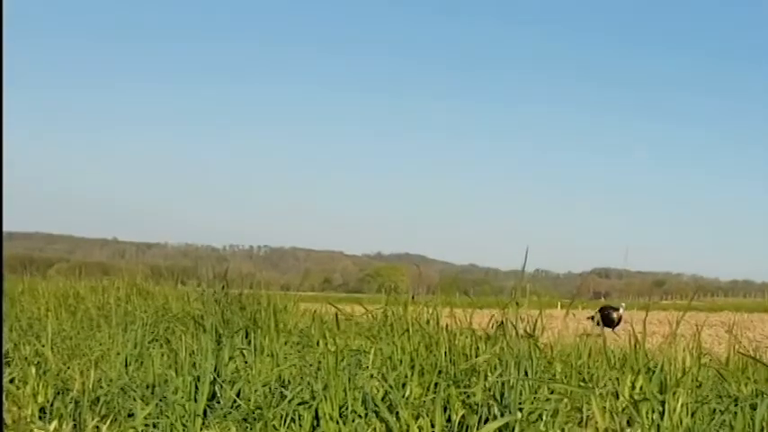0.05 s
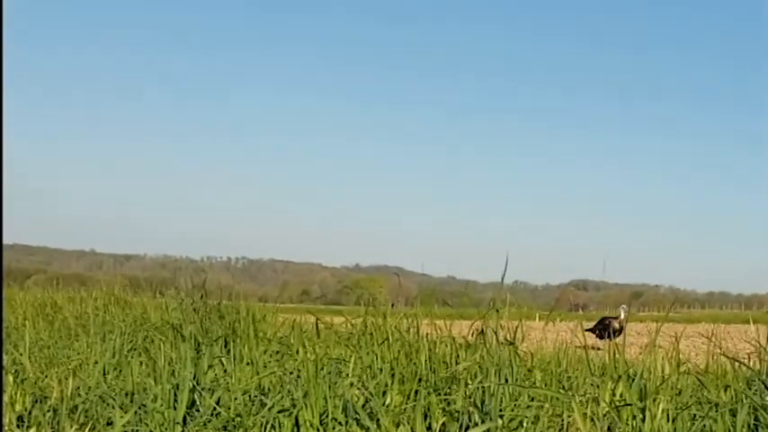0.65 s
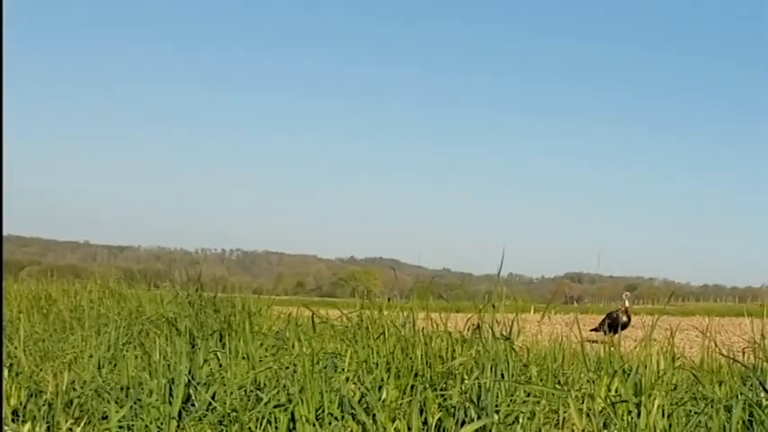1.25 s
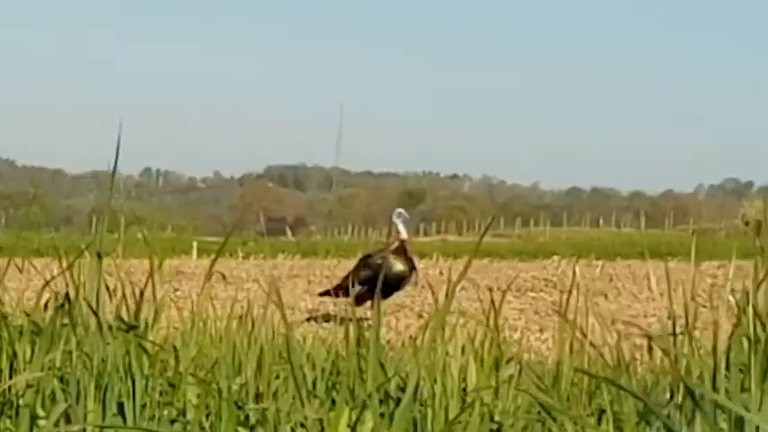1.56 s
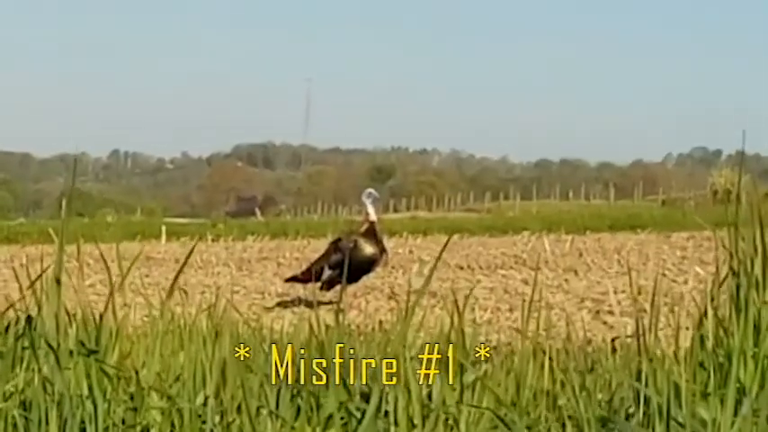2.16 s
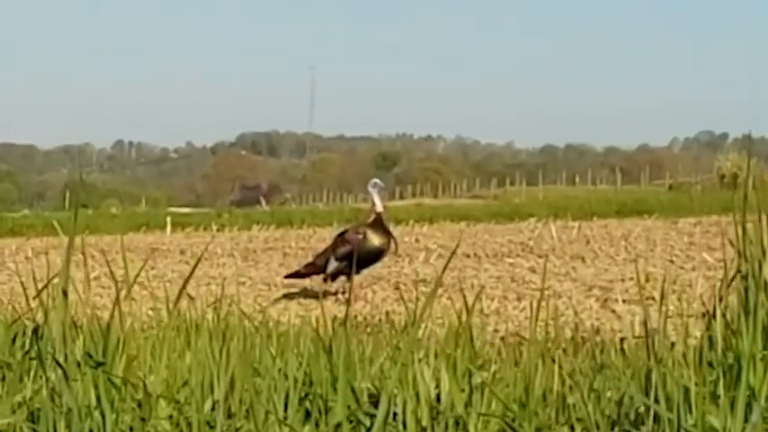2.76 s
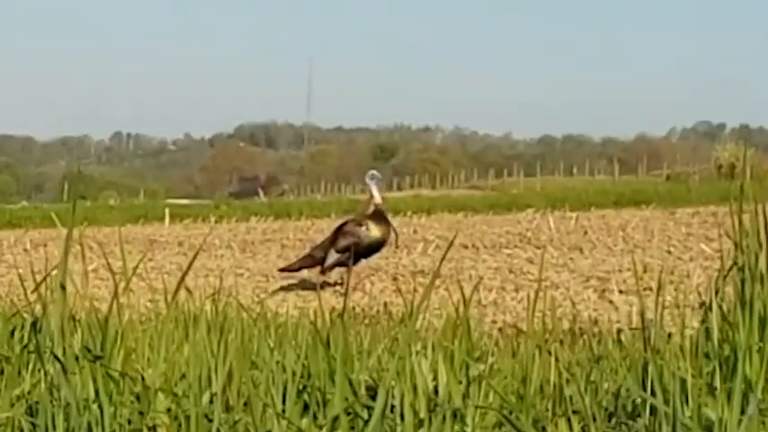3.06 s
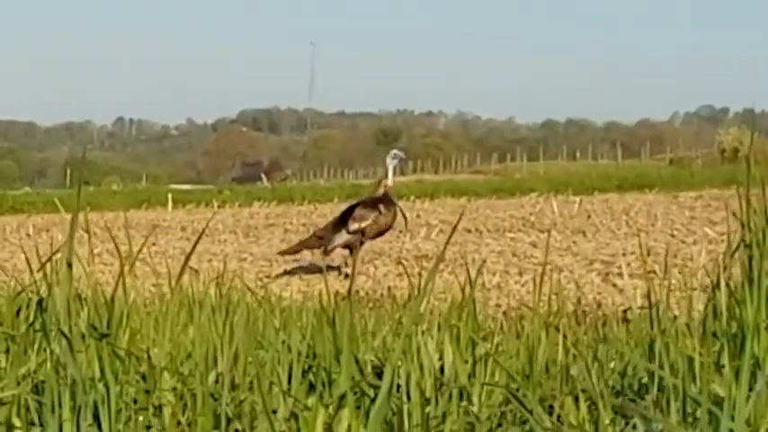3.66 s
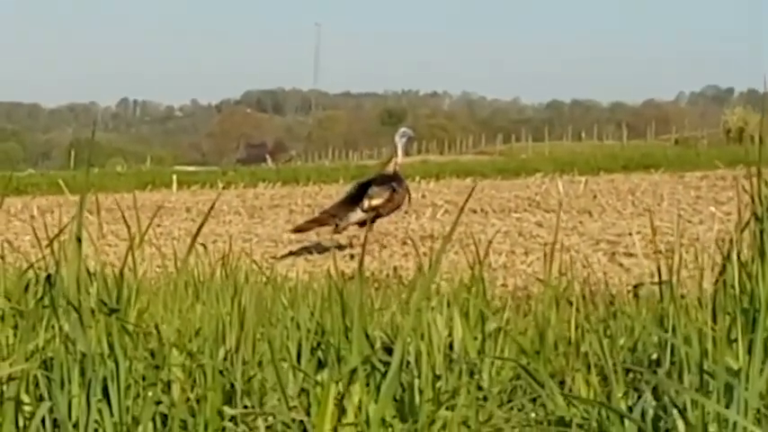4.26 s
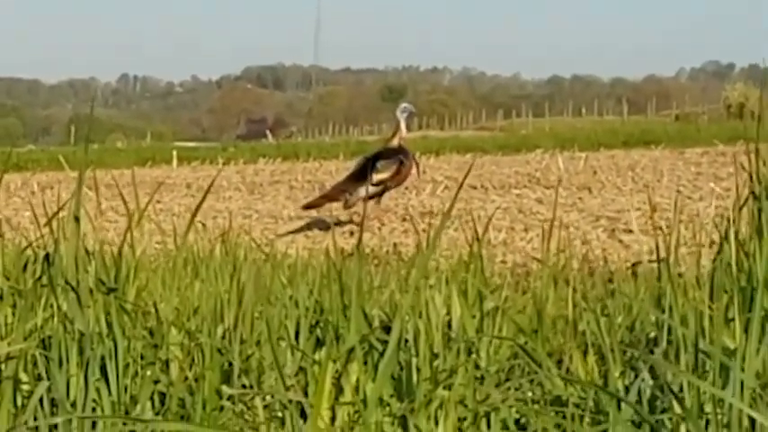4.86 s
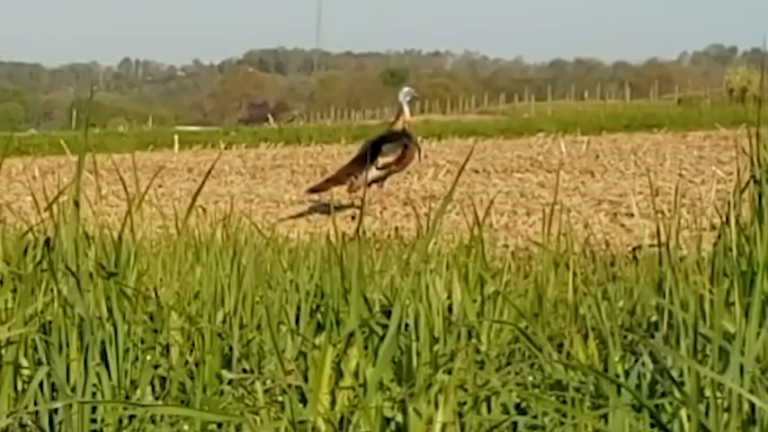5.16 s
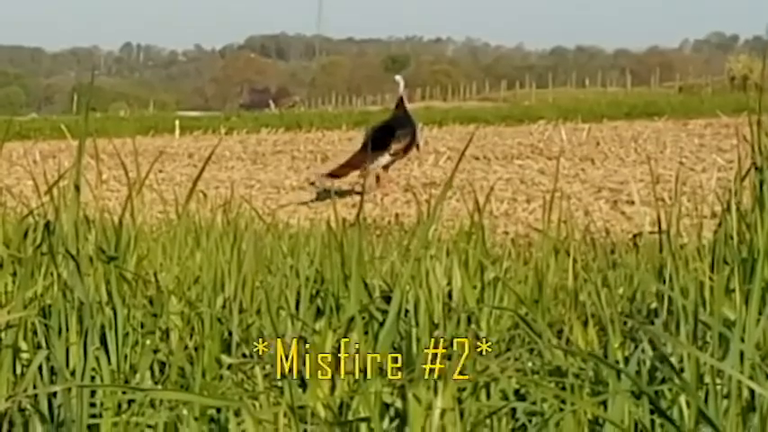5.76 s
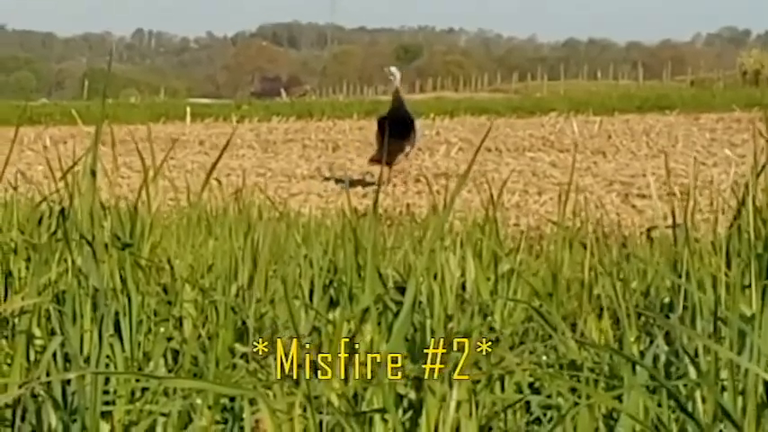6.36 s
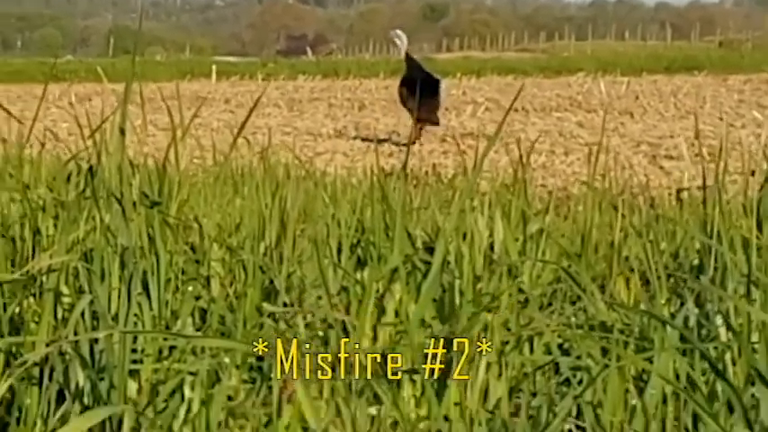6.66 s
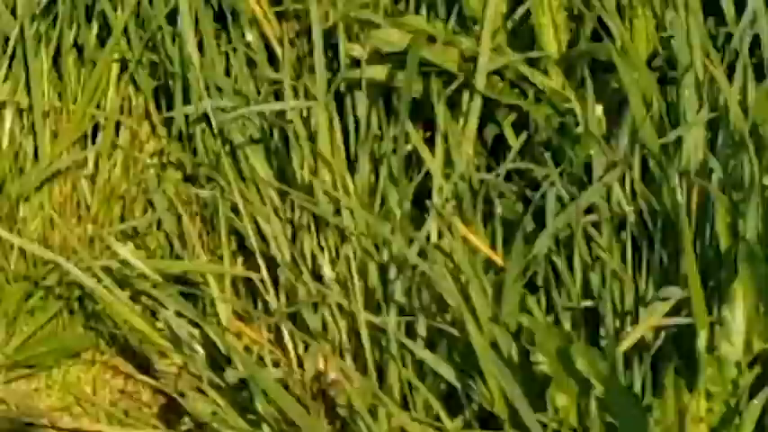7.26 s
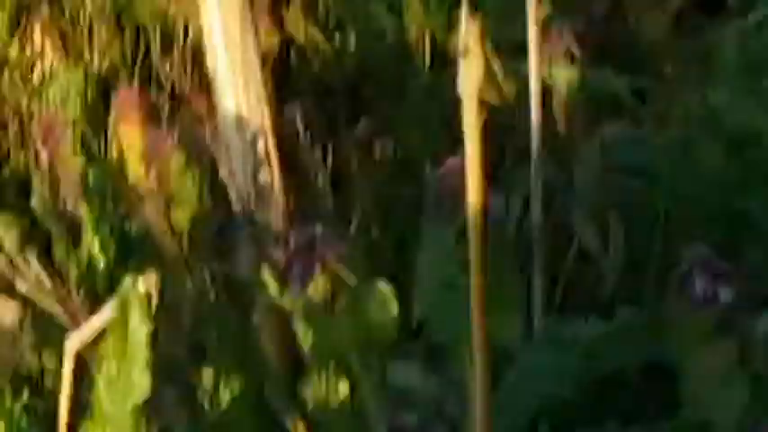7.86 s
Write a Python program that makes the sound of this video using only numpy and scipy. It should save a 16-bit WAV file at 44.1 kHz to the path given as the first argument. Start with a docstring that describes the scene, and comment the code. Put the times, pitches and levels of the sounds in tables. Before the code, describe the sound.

Steel parts of a shotgun click, clack and slide as it is dry-fired and worked twice, with rustling sleeves and faint wind.

```python
"""Faint wind crosses a field; cloth rustles and fingers knock by a close microphone, its left port covered.
At 1.47 s slow motion begins and the treble ends at 10 kHz. A hunter kneeling in tall grass dry-fires a
shotgun (1.8 s), fumbles, then works the action (4.2 s): steel parts clack, chatter and slide, the bolt
jolts the gun and sleeves rustle. The hammer falls again (5.9 s) and the action is worked again (6.7 s).
A dry stalk snaps, and at 7.94 s full speed returns with a last brush of cloth."""
import sys
import numpy as np
from scipy import signal
from scipy.fft import rfft, irfft, next_fast_len
from scipy.io import wavfile
from scipy.ndimage import uniform_filter1d

SR = 44100
rng = np.random.default_rng(int(sys.argv[2]) if len(sys.argv) > 2 else 0)


def wrap_up_sound(samples):
    """Save the sound to the file named by the first command line argument, as 16-bit audio."""
    columns = np.atleast_2d(samples).T
    # keep every value between -1 and 1, then stretch to whole-number steps
    tamed = np.clip(columns, -1, 1)
    steps = np.round(tamed * 32767).astype(np.int16)
    wavfile.write(sys.argv[1], SR, steps)


N = 353593
TIME = np.arange(N) / SR


def from_db(db):
    """Turn decibels into a number to multiply by."""
    return 10 ** (np.asarray(db) / 20)


def rms_one(x):
    """Scale a signal so that its average power is 1."""
    return x / np.sqrt(np.mean(x ** 2) + 1e-20)


def at_hz(points, hz):
    """Read between the rows of a frequency table, giving each octave equal room."""
    f, value = np.transpose(points)
    return np.interp(np.log(np.maximum(hz, 1)), np.log(f), value)


def drift(rate):
    """A wandering curve that heads for a new random value rate times a second."""
    return np.interp(TIME * rate, np.arange(4000), rng.standard_normal(4000))


def add(track, s, sound):
    """Lay a sound into a track, s seconds in."""
    start = int(s * SR)
    track[..., start:start + sound.shape[-1]] += sound[..., :N - start]


def colour(x, spectrum):
    """Give a sound the tone of a frequency table; white noise keeps its power."""
    size = 8192
    gain = rms_one(from_db(at_hz(spectrum, np.fft.rfftfreq(size, 1 / SR))))
    # minimum phase: the filter never sounds before it is struck
    cepstrum = irfft(np.log(gain))
    cepstrum[1:size // 2] *= 2
    cepstrum[size // 2 + 1:] = 0
    response = irfft(np.exp(rfft(cepstrum)))
    return signal.oaconvolve(x, response[None], axes=-1)[:, :x.shape[-1]]


def resonate(x, hz, width_hz):
    """Keep a narrow band of the sound around one pitch."""
    r = np.exp(-np.pi * width_hz / SR)
    feedback = [1, -2 * r * np.cos(2 * np.pi * hz / SR), r * r]
    return signal.lfilter(np.array([1, 0, -1]) * (1 - r * r) / 2, feedback, x)


def ring(x, hz, t60):
    """Every click starts a pure tone that fades by 60 dB in t60 seconds."""
    r, w = from_db(-60 / (t60 * SR)), 2 * np.pi * hz / SR
    return signal.lfilter([0, np.sin(w)], [1, -2 * r * np.cos(w), r * r], x + 1e-18)


def balance(force, treble_db, body_db, split_hz=3700, lowest_hz=270):
    """Set the treble and the body below it apart, dropping deep bass; harder hits have more treble."""
    body = signal.sosfilt(signal.butter(3, split_hz, "low", fs=SR, output="sos"), force)
    body = signal.lfilter(*signal.butter(2, lowest_hz, "high", fs=SR), body)
    treble = signal.sosfilt(signal.butter(3, split_hz, "high", fs=SR, output="sos"), force)
    return from_db(treble_db) * treble + from_db(body_db) * body


def grains(spread_db, shape):
    """Gritty noise: a crowd of tiny hits of very unequal size."""
    hits = rng.standard_normal(shape)
    sizes = from_db(spread_db * np.clip(rng.standard_normal(shape), -2, 2))
    return rms_one(hits * sizes)


def dying_noise(t60):
    """Two bursts of noise, like countless tones fading together."""
    burst = rng.standard_normal((2, 16384)) * from_db(-60 * TIME[:16384] / t60)
    return burst / np.sqrt(np.sum(burst ** 2, axis=1, keepdims=True))


def taps(rows, spectrum, t60, gain_db=0.0):
    """One short, quickly fading touch for each row of a table."""
    track = np.zeros((2, N))
    for s, level_db in rows:
        touch = colour(dying_noise(t60), spectrum)
        add(track, s, from_db(level_db + gain_db) * touch / np.abs(touch).max())
    return track


def friction(level_db, spectrum, grain_db, flutter_db, flutter_rate):
    """Fibres flick past each other under uneven pressure."""
    fibres = rms_one(grains(grain_db, (2, N)) * from_db(flutter_db * drift(flutter_rate)))
    return colour(fibres, spectrum) * from_db(level_db)


def slow_motion(start_s=1.47, end_s=7.94):
    """A smooth switch: 1 in slow motion, 0 at full speed."""
    return uniform_filter1d(((TIME > start_s) & (TIME < end_s)).astype(float), size=512)


# After each try the hands fumble lightly, then work the action hard: start/s, end/s, level/dB
HAND_WORK = [(1.894, 2.315, -69.5), (4.26, 4.961, -48), (5.957, 6.3, -72), (6.733, 7.343, -47)]
def hand_effort(ease_s=0.061):
    """How hard the hands work the gun; zero while they rest."""
    return sum(from_db(level_db) * np.clip(np.minimum(TIME - start, end - TIME) / ease_s, 0, 1)
               for start, end, level_db in HAND_WORK)


# Tone of the open field's far hum: f/Hz, level/dB
FIELD_TONE = [(100, -9), (300, 1), (380, -3.5), (470, 1.5), (590, 0.5), (770, 7), (950, -12.5),
              (1200, -2.5), (1500, -22.5), (3000, -37.5)]
def field(level_db=-83):
    """Distant air makes a steady, very quiet noise."""
    return from_db(level_db) * colour(rng.standard_normal((2, N)), FIELD_TONE)


# Tone of the wind in slow motion: f/Hz, level/dB
WIND_TONE = [(12, -6), (28, 3), (45, 4.5), (70, -7), (100, -16.5), (200, -27), (400, -54.5)]
def wind(slow, slow_db=-63.5, fast_db=-59, lumps_db=-0.5, shake_db=-19.5):
    """A breeze rumbles on the microphone: louder as the hands work, an octave higher at full speed."""
    air = rng.standard_normal((2, N)) * from_db(lumps_db * drift(rate=8))
    slow_air = air * slow * (from_db(slow_db) + from_db(shake_db) * hand_effort())
    fast_air = air * (1 - slow) * from_db(fast_db)
    octave_up = [(2 * hz, db) for hz, db in WIND_TONE]
    return colour(slow_air, WIND_TONE) + colour(fast_air, octave_up)


# Stalks breaking: t/s, level/dB
STALK_SNAPS = [(1.3374, -60), (7.426, -53), (7.8603, -29)]
# Tone of a snap: f/Hz, level/dB
SNAP_TONE = [(300, -1), (900, -8), (1800, 6), (3800, -1.5), (5500, -3), (7000, -9), (11000, -36)]
def stalks():
    """Dry grass stalks snap with a tiny, sharp click."""
    return taps(STALK_SNAPS, SNAP_TONE, t60=0.0085)


# Finger knocks and hand bumps: t/s, level/dB
FINGER_KNOCKS = [(0.199, -34.5), (0.573, -33.5), (0.701, -37.5), (0.785, -44), (0.953, -41), (6.72, -47)]
HAND_BUMPS = [(0.969, -45), (1.314, -44.5), (1.394, -45), (1.459, -49.5), (5.335, -52), (6.674, -45.5),
              (7.858, -38)]
# Tone of each: f/Hz, level/dB
KNOCK_TONE = [(100, -2), (400, -5.5), (800, 7), (1400, 2.5), (2600, -9), (5000, -52)]
BUMP_TONE = [(25, 4), (70, -3.5), (160, 0.5), (300, -20.5), (800, -58)]
def handling():
    """Fingers knock on the camera; the soft hand makes deeper, longer bumps."""
    knocks = taps(FINGER_KNOCKS, KNOCK_TONE, t60=0.031, gain_db=3.5)
    bumps = taps(HAND_BUMPS, BUMP_TONE, t60=0.097, gain_db=1.0)
    return knocks + bumps


# Cloth sliding before and after the slow motion: t/s, hiss level/dB, rub level/dB
CLOTH_BEFORE = [(0.0, -48, -50), (0.008, -44.5, -53), (0.634, -44, -52.5), (0.862, -34, -51),
                (0.91, -47, -59), (0.966, -38, -52), (1.202, -62, -70.5), (1.46, -62.5, -72.5)]
CLOTH_AFTER = [(7.95, -55, -59.5), (8.01, -65, -44.5)]
# Tone of its hiss and its rub: f/Hz, level/dB
CLOTH_HISS_TONE = [(3000, -34), (6500, -15), (9000, -9), (10500, -3.5), (12000, 8.5), (15500, 6.5)]
CLOTH_RUB_TONE = [(120, -1), (300, -5), (600, -3), (1300, -3.5), (2300, -4), (3000, -12), (4200, -4.5),
                  (5400, -1), (6300, -18), (9000, -17)]
def cloth(hiss_gain_db=1.0, rub_gain_db=-1.0):
    """Cloth slides close to the microphone: a fine hiss over a duller rub."""
    times, hiss_levels, rub_levels = np.vstack([CLOTH_BEFORE, CLOTH_AFTER]).T
    hiss_db = np.interp(TIME, times, hiss_levels) + hiss_gain_db
    rub_db = np.interp(TIME, times, rub_levels) + rub_gain_db
    hiss = friction(hiss_db, CLOTH_HISS_TONE, grain_db=6.5, flutter_db=2.6, flutter_rate=29)
    rub = friction(rub_db, CLOTH_RUB_TONE, grain_db=2.5, flutter_db=2.0, flutter_rate=150)
    return hiss + rub


# Arm movements, each swelling to a peak and fading: t/s, swell and fade time/s, level/dB
ARM_SWELLS = [(1.55, 0.34, -62), (1.9, 0.65, -56), (2.65, 0.28, -76), (3.87, .15, -67.5), (4.65, 0.25, -53),
              (5.27, 0.088, -46.5), (6.17, 0.3, -63), (6.98, 0.089, -45), (7.62, 0.053, -45),
              (7.75, 0.18, -46)]
# Tone of the sleeves' hiss and rub in slow motion: f/Hz, level/dB
SLEEVE_HISS_TONE = [(1400, -35.5), (2000, -9.5), (2700, -3), (3200, -20), (4800, -13.5), (6000, 0),
                    (7500, -1.5), (9800, -0.5)]
SLEEVE_RUB_TONE = [(100, -14.5), (250, -2.5), (370, -4), (470, -2), (600, -12), (770, -1.5), (950, -4),
                   (1200, -8.5), (1500, -12.5), (1850, -9), (3000, -25.5)]
def sleeves(rest_hiss_db=-77, rest_rub_db=-90, hiss_gain_db=2.5, arm_rub_db=-18.0, grip_db=-7.0,
            snags_per_s=30, snag_db=17.0, firm_db=-60.5, thinnest_db=-8):
    """Sleeves rustle as the arms move and rub on the gun as it is worked; now and then a fibre snags."""
    motion = np.sqrt(sum((from_db(level_db) * np.exp(-np.abs(TIME - s) / swell_s)) ** 2
                         for s, swell_s, level_db in ARM_SWELLS))
    hiss_db = 20 * np.log10(np.hypot(from_db(rest_hiss_db), motion))
    rubbing = from_db(arm_rub_db) * motion + from_db(grip_db) * hand_effort()
    rub_db = 20 * np.log10(from_db(rest_rub_db) + rubbing)
    snags = (rng.random((2, N)) < snags_per_s / SR) * rng.standard_normal((2, N))
    crackle = colour(snags, SLEEVE_HISS_TONE) * from_db(hiss_db + snag_db)
    hiss = friction(hiss_db + hiss_gain_db, SLEEVE_HISS_TONE,
                    grain_db=5.5, flutter_db=2.6, flutter_rate=340)
    rub = friction(rub_db, SLEEVE_RUB_TONE, grain_db=0.5, flutter_db=1.5, flutter_rate=87)
    body_db = np.clip(hiss_db - firm_db, thinnest_db, 0)   # gentle moves sound thinner
    return balance(hiss + crackle, 0, body_db, split_hz=4540) + rub


def rattle(ticks_per_s=130, spread_db=6.0, scuff_db=-10.0):
    """While the hands work, loose parts tick at random over a faint scuffing."""
    clicks = (rng.random(N) < ticks_per_s / SR) * rng.choice([-1, 1], (2, N))
    sizes = from_db(spread_db * np.clip(rng.standard_normal(N), -2, 2))
    scuff = from_db(scuff_db) * rng.standard_normal((2, N))
    return balance(hand_effort() * (rms_one(clicks * sizes) + scuff), treble_db=0, body_db=3.5)


# The bolt unlocks or reaches the end of its travel: t/s, level/dB
BOLT_JOLTS = [(4.227, -39.5), (4.447, -24), (4.554, -16.5), (4.931, -23.5), (7.349, -21.5)]
def jolts(push_s=0.0032):
    """The bolt gives the whole gun a smooth, heavy push that wakes only its lowest tones."""
    force = np.zeros((2, N))
    push = np.sin(np.pi * np.minimum(TIME[:1024] / push_s, 1)) ** 2
    for s, level_db in BOLT_JOLTS:
        add(force, s, from_db(level_db) * push)
    return force


# Bolt, bars and shell sliding: start/s, end/s, level/dB
STEEL_SLIDES = [(1.756, 1.767, -26.5), (1.772, 1.818, -26.5), (2.266, 2.307, -48), (4.333, 4.363, -36),
                (4.423, 4.445, -32), (4.472, 4.508, -18.5), (4.558, 4.6, -28), (4.71, 4.737, -28),
                (4.755, 4.804, -26), (4.885, 4.927, -23.5), (5.862, 5.877, -38.5), (5.873, 5.922, -33),
                (6.832, 6.857, -30.5), (6.887, 6.923, -31), (6.921, 6.98, -23), (7.036, 7.074, -33),
                (7.137, 7.221, -29.5), (7.283, 7.364, -26.5)]
def slides(grit_db=8.5, catch_db=4.0, catch_rate=300, even_db=-34, dulling=0.18):
    """Steel scrapes on steel, catching and slipping, fastest in the middle of each stroke."""
    force = np.zeros((2, N))
    scrape = rms_one(grains(grit_db, (2, N)) * from_db(catch_db * drift(catch_rate)))
    for start, end, level_db in STEEL_SLIDES:
        speed = np.abs(np.sin(np.linspace(0, np.pi, int((end - start) * SR))))
        stroke = scrape[:, int(start * SR):][:, :len(speed)] * np.sqrt(speed)
        body_db = level_db + dulling * (even_db - level_db)   # weak strokes are duller
        add(force, start, balance(stroke, level_db, body_db))
    return force


# The hammer landing: t/s, level/dB
HAMMER_THUDS = [(1.761, -31), (1.771, -29.5), (5.879, -27.5)]
# Tone of a thud: f/Hz, level/dB
THUD_TONE = [(200, -38), (280, -13.5), (350, -1), (450, 2), (560, -8), (800, -10.5), (1500, -37)]
def hammer():
    """The hammer falls and thuds in the stock, the gun's shoulder piece."""
    return taps(HAMMER_THUDS, THUD_TONE, t60=0.07, gain_db=4.5)


# Steel parts meeting inside the gun: t/s, treble level/dB, body level/dB, clack f/Hz, ping f/Hz
STEEL_HITS = [(1.7115, -37, -54.5, 2030, 5700), (1.7726, -6, -27, 2050, 6500), (1.7995, -8, -47, 355, 6350),
              (1.8592, -21, -37, 904, 5940), (1.8779, -24, -39.5, 2250, 6080),
              (1.9006, -22, -36, 2200, 6000), (2.1314, -53.5, -58, 426, 8120),
              (2.2204, -63, -49, 553, 6100), (2.2633, -25.5, -40, 890, 6400),
              (2.3163, -21, -32.5, 759, 6600), (3.2277, -52.5, -58.5, 1113, 7640),
              (3.277, -64, -60.5, 487, 8870), (3.9999, -42.5, -47.5, 1890, 5960),
              (4.0408, -30, -46.5, 904, 6030), (4.0819, -43, -44, 902, 6040),
              (4.2247, -19.5, -44.5, 2410, 6400), (4.2977, -51, -37.5, 2350, 6200),
              (4.3596, -9.5, -32.5, 1880, 9520), (4.388, -21, -38.5, 2730, 6370),
              (4.4169, -18.5, -36.5, 620, 8900), (4.4465, -4.5, -22.5, 2300, 6600),
              (4.4682, -5.5, -28.5, 740, 9400), (4.4844, -13, -21.5, 790, 6990),
              (4.5515, -0.5, -21.5, 2650, 6960), (4.5715, -7.5, -20.5, 2710, 5500),
              (4.598, -11, -26, 2780, 5980), (4.6463, -28, -57.5, 2330, 9100),
              (4.6728, -33, -38, 791, 6600), (4.7007, -9.5, -35, 650, 6800), (4.7202, -7, -27, 730, 6240),
              (4.7518, -9, -40, 2570, 6140), (4.8314, -25, -39, 860, 9100),
              (4.8554, -24.5, -30.5, 1030, 8800), (4.8865, -4.5, -27.5, 950, 6540),
              (4.9092, -9.5, -24.5, 930, 6530), (4.9298, -3.5, -25, 1190, 9100),
              (5.078, -48, -64.5, 760, 9500), (5.878, -4, -23, 2300, 7400), (6.0634, -31, -42.5, 902, 5870),
              (6.244, -61, -52.5, 455, 5900), (6.338, -21.5, -40, 413, 7000),
              (6.7616, -24, -36.5, 880, 6930), (6.7829, -13.5, -31.5, 2380, 6200),
              (6.8633, -8, -29, 2690, 9100), (6.9277, -4, -26, 2340, 9600), (6.9513, -5, -27, 2260, 9660),
              (7.0304, -24, -33.5, 790, 10100), (7.0557, -26, -32.5, 2430, 6160),
              (7.0713, -14, -30, 2500, 7660), (7.1004, -45, -43, 786, 7990), (7.1277, -13, -32, 764, 9350),
              (7.1501, -10, -26.5, 1100, 9450), (7.1778, -13.5, -42, 2310, 6960),
              (7.2974, -16, -38, 2630, 6010), (7.3213, -29, -36, 483, 6460),
              (7.3485, -9.5, -27, 2300, 10150), (7.5212, -57, -55, 295, 5900),
              (7.8924, -31.5, -53.5, 448, 6430)]
def clacks(first_share=0.19, chatter_s=0.0025, chatter_spread_db=5, clack_db=6.0, ping_db=3.0,
           treble_gain_db=-11.5, body_gain_db=4.0):
    """Each part lands with one sharp blow, chatters to rest and sounds its own clack and ping."""
    force, t = np.zeros((2, N)), TIME[:4096]
    for s, treble_db, body_db, clack_hz, ping_hz in STEEL_HITS:
        settle_s = chatter_s * from_db(chatter_spread_db * rng.uniform(-0.5, 1))
        blow = grains(spread_db=6.0, shape=(2, len(t))) * np.exp(-t / (2 * settle_s))
        # the chatter and the first sharp blow share the energy
        blow *= np.sqrt((1 - first_share) / np.sum(blow ** 2, axis=1, keepdims=True))
        blow[:, 10] += np.sqrt(first_share) * rng.choice([-1, 1], 2)
        clack = from_db(clack_db) * resonate(blow, clack_hz, width_hz=130)
        ping = from_db(ping_db) * resonate(blow, ping_hz, width_hz=260)
        add(force, s, balance(blow + clack + ping, treble_db + treble_gain_db, body_db + body_gain_db))
    return force * np.sqrt(SR / 100)


# Overall tone of the gun's many short vibrations: f/Hz, level/dB
GUN_TONE = [(40, -36.5), (120, -28), (200, -13), (380, -4), (800, -6.5), (1200, -5.5), (1550, -7),
            (2000, -6), (2500, -2.5), (3300, -19.5), (5000, -12), (6000, 0), (7900, -4), (9300, -1.5)]
# Tones of stock, barrel and spring that ring on: f/Hz, level/dB, time to fade by 60 dB/s
GUN_RINGS = [(73, -59, 0.27), (232.6, -55, 0.23), (292, -55, 0.057), (387, -50, 0.13), (499, -50, 0.19),
             (633.3, -49.5, 0.031), (863, -47.5, 0.019), (970, -52.5, 0.15), (984, -49.5, 0.062),
             (1400, -57.5, 0.15), (2460, -47, 0.048), (2734, -38, 0.034), (6300, -54, 0.067),
             (6700, -47, 0.1), (6050, -45.5, 0.096), (6600, -45.5, 0.065), (9600, -43, .06)]
def gun(force, crack_db=5.0, steel_db=0.5, stock_db=-4.5, stock_cutoff_hz=1300, grass_db=-35.0,
        rings_db=-2.0, place_db=6.0):
    """A blow makes the gun crack, its steel ring briefly, its stock longer and the grass echo faintly."""
    stock = signal.lfilter(*signal.butter(2, stock_cutoff_hz, fs=SR), dying_noise(t60=0.19))
    steel = dying_noise(t60=0.055)
    grass = dying_noise(t60=0.67)
    answer = from_db(steel_db) * steel + from_db(stock_db) * stock + from_db(grass_db) * grass
    answer[:, 0] += from_db(crack_db)
    sound = signal.oaconvolve(force, colour(answer, GUN_TONE), axes=-1)[:, :N]
    for hz, level_db, t60 in GUN_RINGS:
        # the point of contact moves, so each tone is struck now more, now less
        wander_db = place_db * np.tanh(drift(rate=20))
        sound += ring(force * from_db(level_db + rings_db + wander_db), hz, t60)
    return sound


# The microphone's covered left port (opening) against its open right one: f/Hz, level/dB
LEFT_SHADE = [(60, -0.5), (200, -2.5), (400, -4.5), (800, -4), (1200, -7.5), (1500, 3.5), (1900, -15.5),
              (2400, -9), (3500, -11.5), (4800, -10), (6500, -22), (7800, -15.5), (9300, -23), (13000, -21)]
# How alike the two sides are: f/Hz, likeness from 0 to 1
SIDE_LIKENESS = [(50, .88), (500, .9), (1200, 0.38), (2500, 0.36), (5000, 0.53), (12000, 0.12)]
def microphone(pair, right_lag_s=0.00025):
    """Two signals become left and right: partly alike, the left dull and a little early."""
    size = next_fast_len(N + 2048)
    hz = np.fft.rfftfreq(size, 1 / SR)
    shared, own = rfft(pair, size)
    alike = at_hz(SIDE_LIKENESS, hz)
    shade = from_db(at_hz(LEFT_SHADE, hz))
    left = shade * (alike * shared + np.sqrt(1 - alike ** 2) * own)
    right = shared * np.exp(-2j * np.pi * hz * right_lag_s)
    make_up = 2 / np.sqrt(1 + shade ** 2 + shade * alike)
    return irfft(np.array([left, right]) * make_up, size)[:, :N]


def scene(gun_left_db=-1.5, gun_right_db=-1.0):
    """Gun (held to the right) and sleeves in slow motion, cloth before and after, wind throughout."""
    slow = slow_motion()
    shotgun = gun(clacks() + slides() + rattle() + jolts()) + hammer()
    rustle = slow * sleeves() + (1 - slow) * cloth()
    background = rustle + handling() + stalks() + wind(slow) + field()
    return microphone(shotgun) * from_db([[gun_left_db], [gun_right_db]]) + microphone(background)


def low_pass(x, hz):
    """Cut the treble very steeply above hz."""
    return signal.sosfilt(signal.ellip(12, .1, 80, hz, fs=SR, output="sos"), x)


def record(dry):
    """Round off the loudest peaks and cut the treble, further down in slow motion."""
    ceiling, slow_cutoff_hz, cutoff_hz = 0.8, 10000, 16000
    slow = slow_motion()
    rounded = dry / (1 + (dry / ceiling) ** 4) ** .25
    return low_pass(slow * low_pass(rounded, slow_cutoff_hz) + (1 - slow) * rounded, cutoff_hz)


dry = scene()
out = record(dry)
wrap_up_sound(out)
```